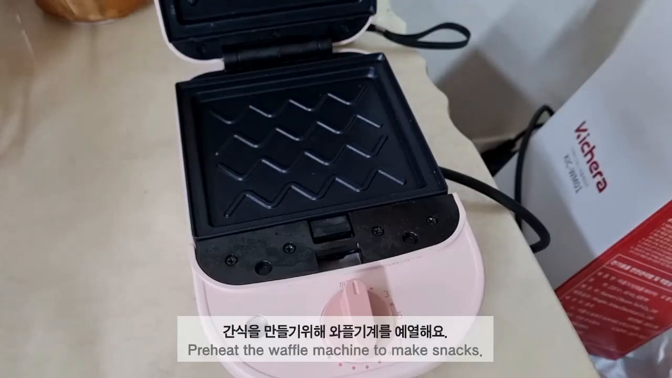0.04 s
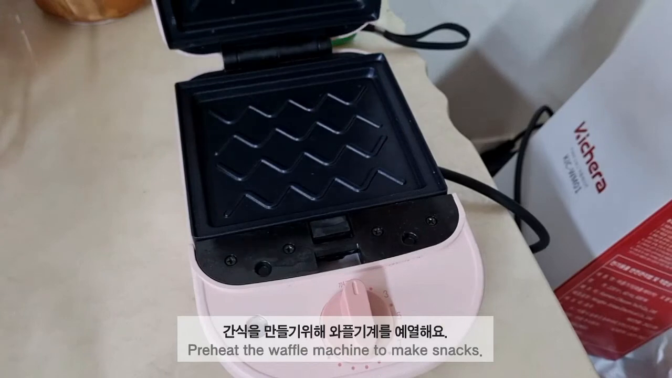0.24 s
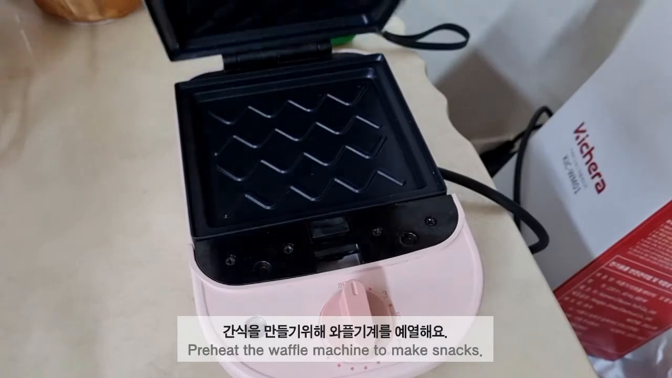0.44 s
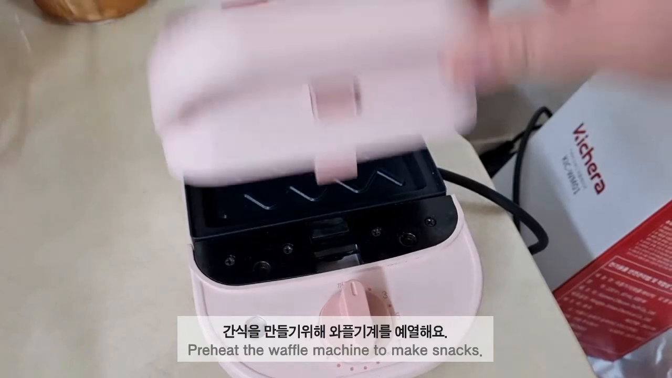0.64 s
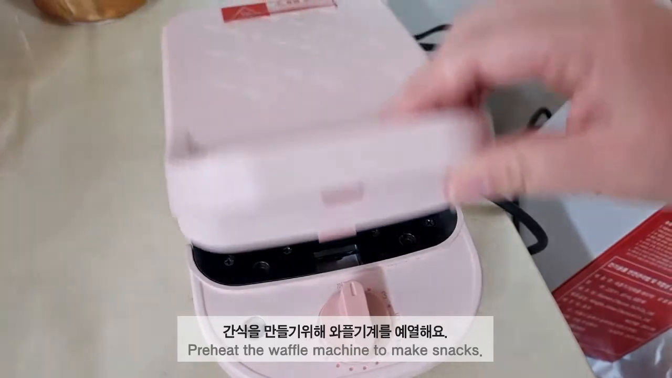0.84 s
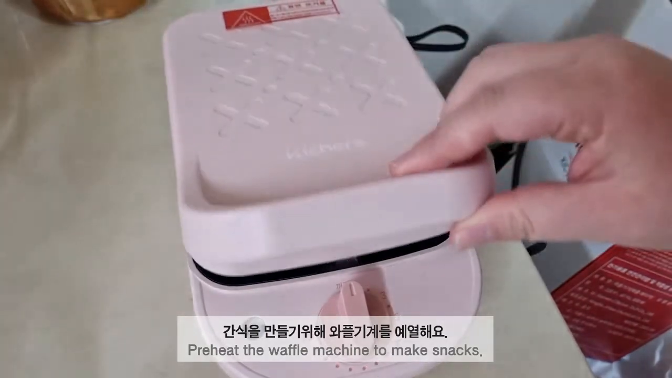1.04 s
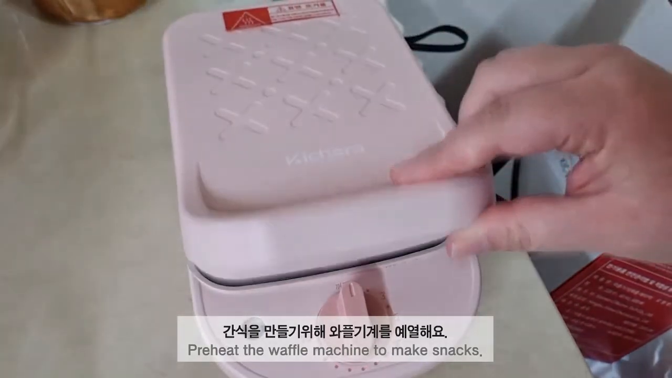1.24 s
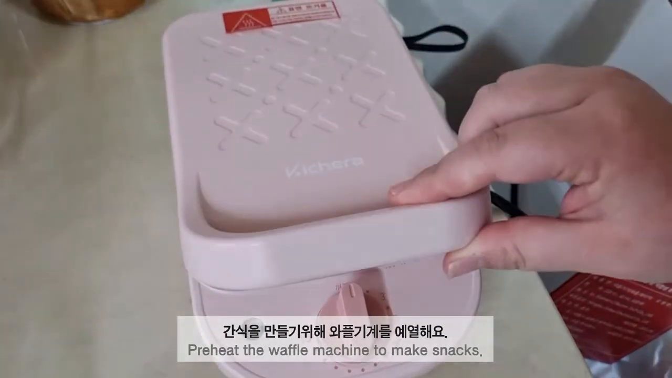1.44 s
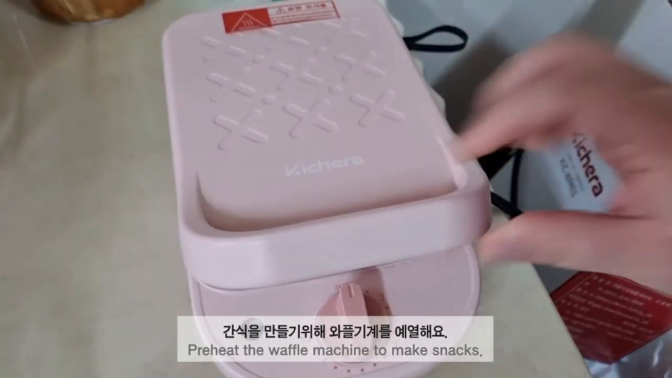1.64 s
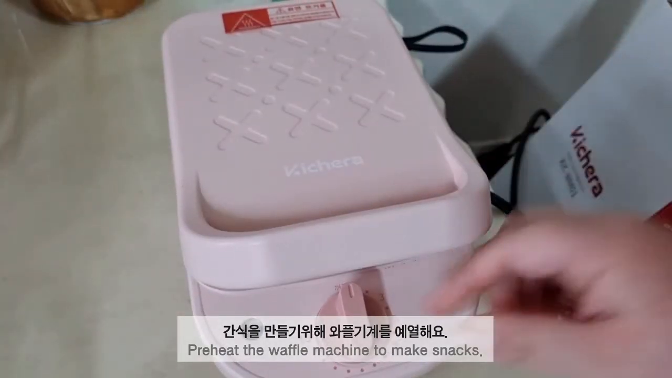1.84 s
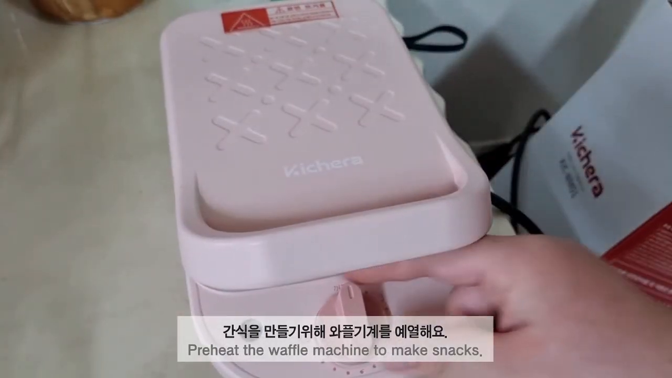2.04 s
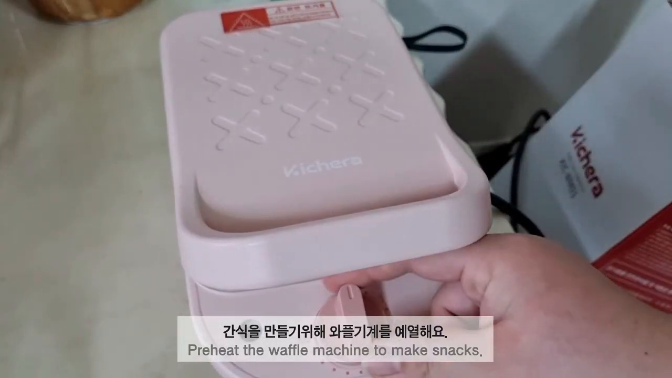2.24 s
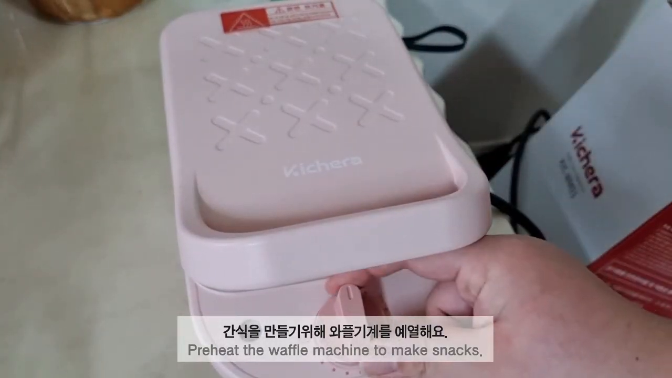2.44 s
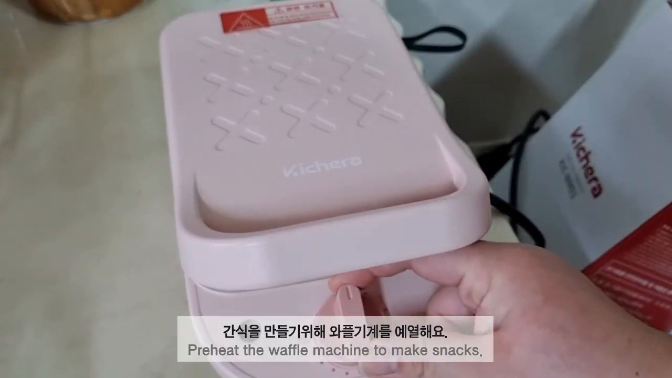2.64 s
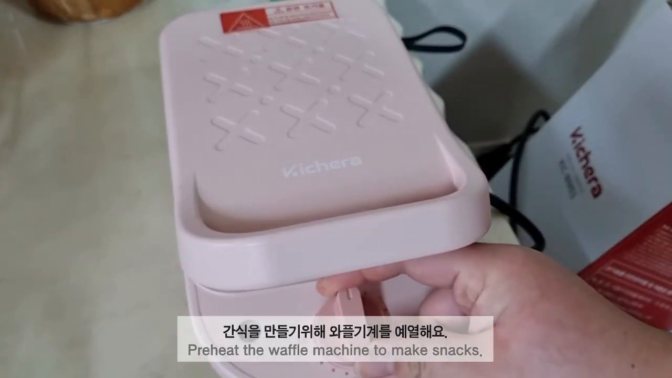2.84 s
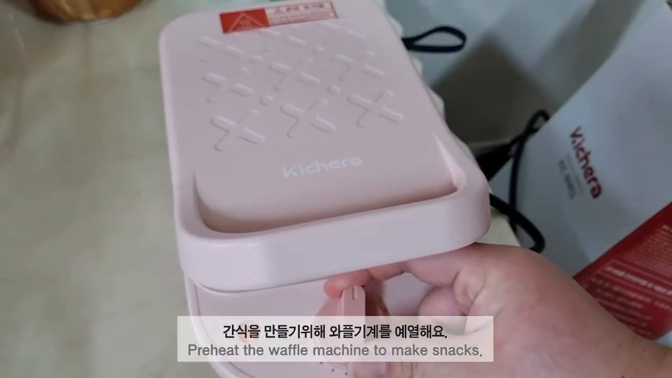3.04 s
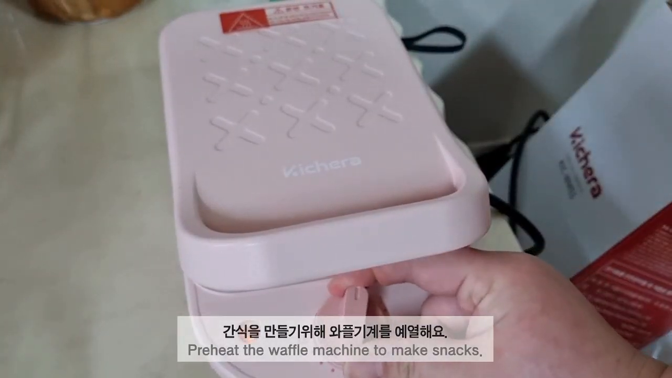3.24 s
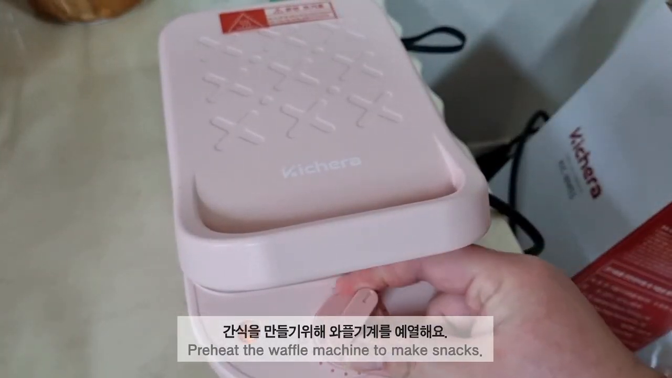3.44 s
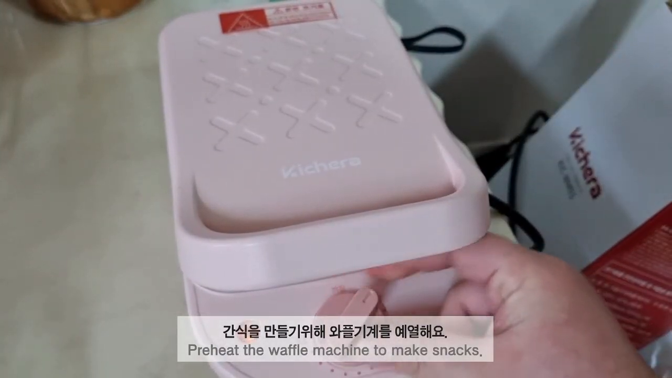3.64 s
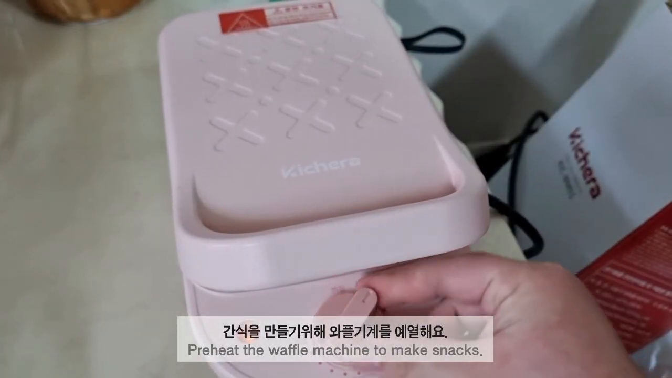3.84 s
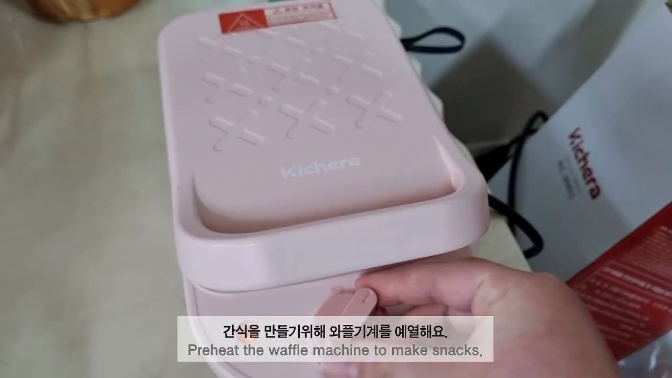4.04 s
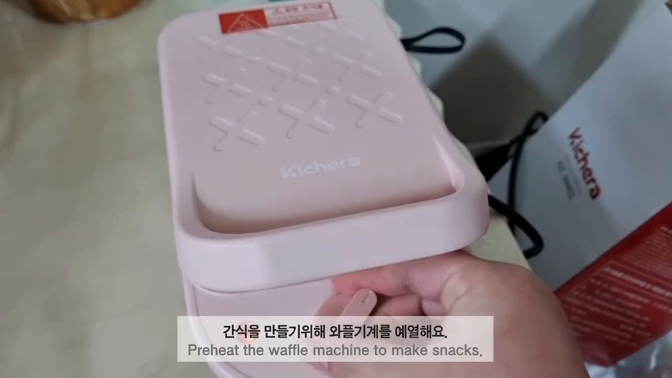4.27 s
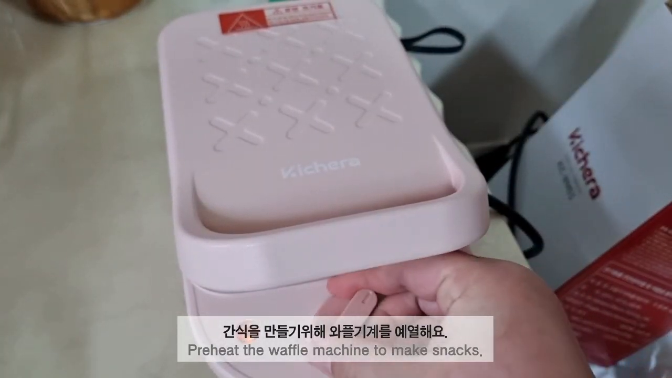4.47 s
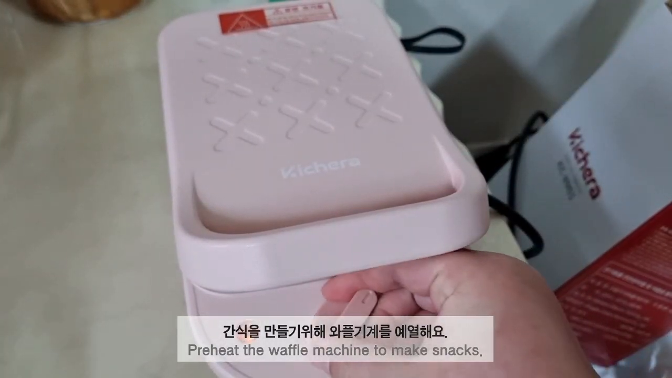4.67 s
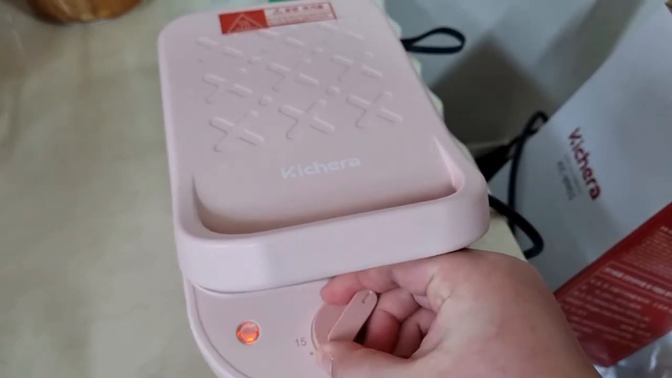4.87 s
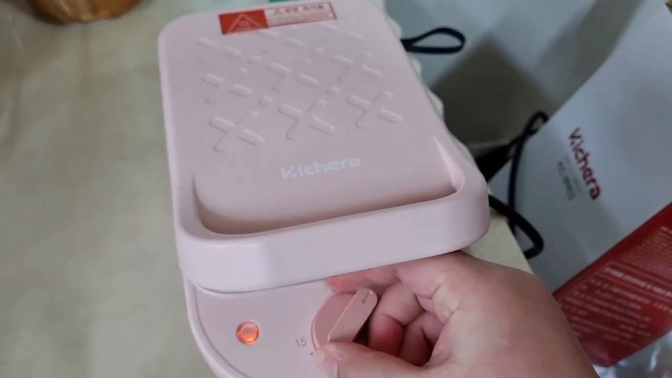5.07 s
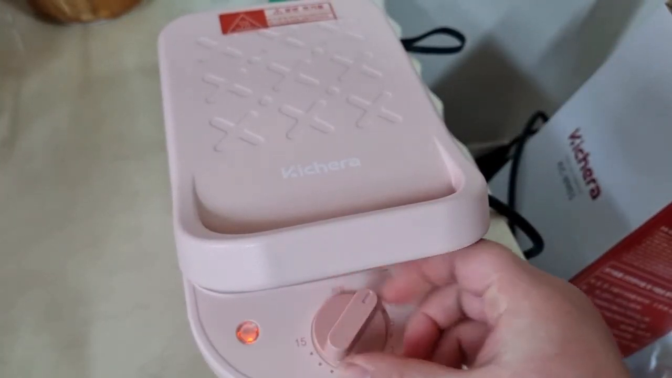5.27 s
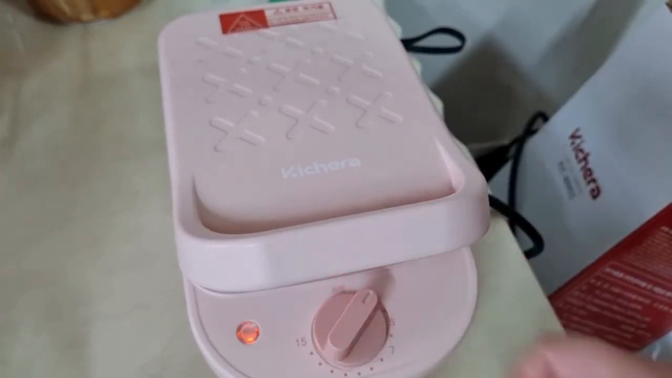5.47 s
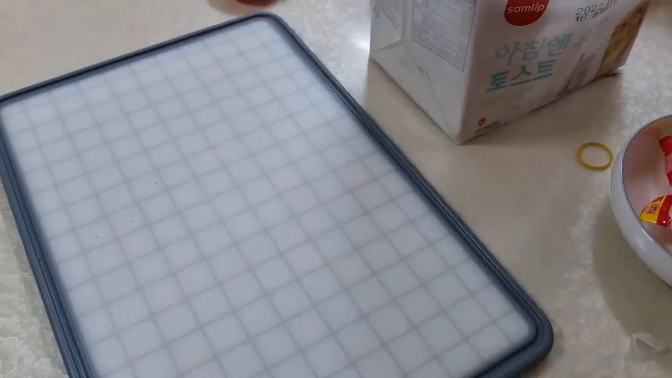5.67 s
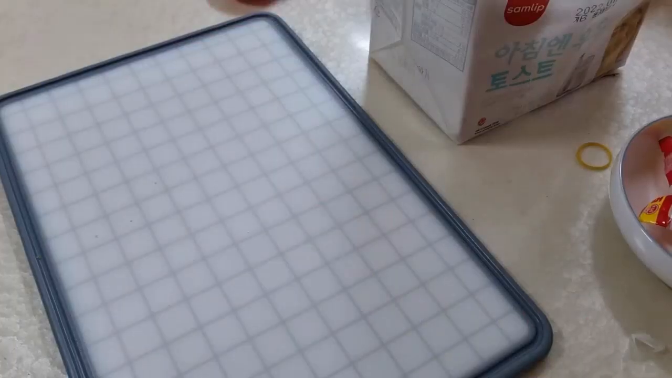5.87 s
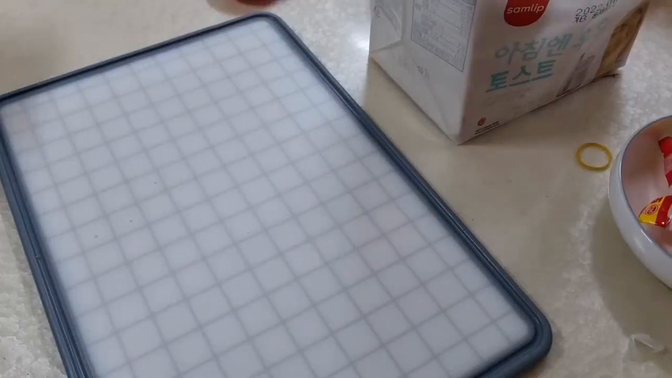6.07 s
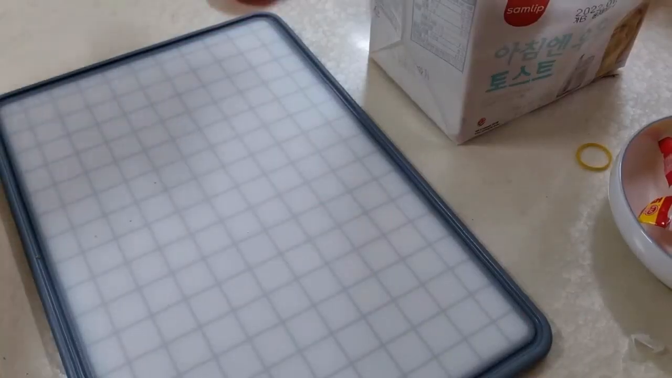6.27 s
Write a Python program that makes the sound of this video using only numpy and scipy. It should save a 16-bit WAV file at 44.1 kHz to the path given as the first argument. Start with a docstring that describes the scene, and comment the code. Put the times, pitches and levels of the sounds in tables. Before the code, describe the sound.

In a small kitchen, a hollow plastic lid snaps closed, followed by a quick ratchety rasp and slow single clicks of a wound dial.

```python
"""Waffle maker lid and timer

A plastic lid is lowered, touches the latch and snaps shut. Then a timer dial is wound: its ratchet clicks
unevenly, slips through one quick run and settles to single clicks, amid soft squeaks and rustles of the hand.
Impacts are sums of decaying modes, a few strong ones over a crowd of weaker ones; rubbing is filtered noise.
A small room answers by convolution with decaying noise, over a rumble of shaped noise and a hum of sine tones."""
import sys
import numpy as np
from scipy import signal
from scipy.fft import rfft, irfft, next_fast_len
from scipy.io import wavfile
from scipy.ndimage import map_coordinates

SR = 44100
rng = np.random.default_rng(int(sys.argv[2]) if len(sys.argv) > 2 else 0)


def dump(signal):
    """Clip the signal to [-1, 1] and save it as 16-bit WAV at the path in sys.argv[1]."""
    limited = np.clip(np.atleast_2d(signal).T, -1, 1)
    pcm = np.round(limited * 32767).astype(np.int16)
    wavfile.write(sys.argv[1], SR, pcm)


N = 278368
TIME = np.arange(N) / SR
TOP_HZ = 16300  # upper limit of the modes and of the recorder's band
PLATE_HZ = 5410  # the metal plate's long ring

# the pawl drops over a tooth of the timer: t/s, level/dB, bass weight of the seating knob/dB, favoured f/Hz
CLICKS = [(3.0328, -38.5, 0, 7600), (3.0521, -36, 12, 6340), (3.0672, -37, 15, 7700),
          (3.08, -36.5, 19, 5730), (3.126, -38, 5, 2620), (3.161, -34, 7, 5600), (3.174, -33.5, 16, 7600),
          (3.4044, -34, 11, 2670), (3.4162, -35.5, 28, 6600), (3.494, -35.5, 23, 1190),
          (3.7635, -28.5, 16, 3800), (4.030, -35.5, 16, 7360), (4.314, -30, 8, 3760),
          (4.5888, -32.5, 2, 3080), (4.864, -23.5, 10, 3950), (5.0903, -35.5, 19, 3850),
          (5.3305, -29.5, 17, 4810), (5.5861, -35.5, 22, 1157)]
# the knob jumps after the pawl and seats: delay, level relative to the drop
SEAT_S, SEAT_DB = 0.0029, -9
# weaker modes of the dial's housing: f/Hz, relative density level/dB
HOUSING_CROWD = [(250, -49), (420, 1.5), (650, -15.5), (900, -1), (1700, -4), (2800, 0.5), (4100, -2.5),
                 (5200, -6), (8000, -4), (9200, -9), (12500, -7.5), (16000, -8.5)]
# decay of the weaker modes of dial and latch tongue: f/Hz, t60/s
SMALL_PART_DECAY = [(500, 0.04), (2500, 0.025), (12000, 0.038)]
# knocks of the lid before the slam, and one faint tick after it:
# t/s, level/dB, contact sharpness f/Hz, favoured f/Hz
KNOCKS = [(1.073, -27.5, 3320, 2570), (1.0904, -25.5, 3199, 1040), (1.0950, -28.5, 2663, 950),
          (1.1308, -23.5, 4445, 632), (1.3069, -30, 8310, 4260), (1.32, -19, 6500, 2700),
          (1.329, -22, 5000, 1210), (1.598, -49, 2420, 1910)]
SLAM_S = 1.3314  # the catch gives way and the lid slams home


def amp(db):
    """Level definition: 20 dB is a tenfold amplitude."""
    return 10 ** (np.asarray(db) / 20)


def unit(x):
    """Normalisation by signal power: x at rms 1."""
    return x / np.sqrt(np.mean(x ** 2) + 1e-20)


def along(points, hz):
    """Interpolation of (Hz, value) points on a logarithmic frequency axis."""
    f, v = np.transpose(points)
    return np.interp(np.log(hz + 1), np.log(f + 1), v)


def wobble(rate):
    """Band-limited random fluctuation: a smooth curve through rate random knots a second."""
    knots = rng.standard_normal(int(N * rate / SR) + 4)
    return map_coordinates(knots, [TIME * rate])


def filtered(x, response):
    """Linear filtering: the spectrum of x times a response of frequency."""
    m = next_fast_len(N + SR // 2)
    spectrum = rfft(x, m) * response(np.fft.rfftfreq(m, 1 / SR))
    return irfft(spectrum, m)[..., :N]


def add(track, s, sound):
    """Superposition: mix a sound into a track at time s."""
    part = track[..., max(round(s * SR), 0):][..., :sound.shape[-1]]
    part += sound[..., :part.shape[-1]]


def ears(x):
    """Interaural coherence: two unrelated signals become a pair alike in the bass, unrelated in the treble."""
    # likeness of a diffuse sound at the two ears: f/Hz, correlation
    coherence = [(60, .94), (200, .96), (300, .65), (550, -.3), (1650, -.2), (5000, 0)]

    def mid_side(hz):
        angle = np.arccos(np.clip(along(coherence, hz), -1, 1)) / 2
        return np.array([np.cos(angle), np.sin(angle)])

    mid, side = filtered(x, mid_side)
    return np.array([mid + side, mid - side])


def leaning(x, left_db):
    """Interaural level difference: shift a sound towards the left ear."""
    return x * amp(left_db * np.array([[.5], [-.5]]))


def hum(lines, waver):
    """Phase modulation: motor tones with slowly wandering phases."""
    out = np.zeros(N)
    for hz, db in lines:
        phase = 2 * np.pi * hz * TIME + waver * wobble(7.4)
        out += np.sqrt(2) * amp(db) * np.sin(phase)
    return out


def background(dip_at_s=5.705, dip_s=0.014, rumble_db=-54.5):
    """Diffuse noise plus tones: the level dips briefly, then the rumble is duller and the hum has other notes."""
    # rumble spectrum: f/Hz, relative density level/dB
    rumble_shape = [(22, -21.5), (37, -20), (48, 3), (78, 0.5), (130, -9), (185, -18.5), (240, -12),
                    (310, -16), (480, -17.5), (750, -21.5), (1500, -36.5), (3100, -47.5), (4500, -63),
                    (8000, -70)]
    # the duller rumble after the dip: f/Hz, gain/dB
    rumble_change = [(200, -1), (700, -2.5), (1500, -1), (2700, -7), (4000, 0.5)]
    # hum of kitchen appliances before and after the dip: f/Hz, level/dB
    hum_first = [(237, -72.5), (301, -71.5), (479, -80), (721, -81.5), (824, -84.5)]
    hum_later = [(119, -74), (216, -76.5), (300, -76.5), (500.6, -74.5), (602, -78.5), (823.6, -75.5)]
    noise = filtered(rng.standard_normal((2, N)), lambda hz: amp(along(rumble_shape, hz)))
    rumble = amp(rumble_db) * unit(ears(noise))
    first = rumble + hum(hum_first, waver=0.91)
    duller = filtered(rumble, lambda hz: amp(along(rumble_change, hz)))
    later = duller + hum(hum_later, waver=0.55)
    dip = 1 - np.exp(-((TIME - dip_at_s) / dip_s) ** 4)
    return np.where(TIME < dip_at_s, first, later) * dip


def kitchen(x, t60, build_s):
    """Reverberation: the tail builds up from the first walls, and each frequency dies at its own speed."""
    # the room's response: f/Hz, gain/dB
    room_gain = [(120, -16), (310, -13.5), (470, -18), (700, -10.5), (1200, -12.5), (1700, -10),
                 (2700, -10), (5000, -12), (12000, -11.5)]
    hz, t, z = signal.stft(rng.standard_normal((2, SR * 2 // 3)), SR, nperseg=256)
    fade = amp(-60 * t / along(t60, hz)[:, None]) * (1 - np.exp(-(t / build_s) ** 2))
    fade /= np.sqrt(np.mean(fade ** 2, axis=1, keepdims=True))
    gain = amp(along(room_gain, hz))[:, None]
    tail = signal.istft(z * fade * gain, SR, nperseg=256)[1]
    return signal.fftconvolve(x, tail / np.sqrt(tail.shape[1]), axes=1)


def room(x, build_s, count=24):
    """Time-varying reverberation: each of count equal stretches of sound gets its own random tail."""
    # reverberation time: f/Hz, t60/s
    room_t60 = [(120, 0.5), (600, 0.48), (2000, 0.2965), (5000, 0.26), (8000, 0.245), (13000, 0.17)]
    out = np.zeros((2, N))
    for part, times in zip(np.array_split(x, count, axis=1), np.array_split(TIME, count)):
        add(out, times[0], kitchen(part, room_t60, build_s))
    return ears(out)


def fingers(q=22):
    """Resonant filtering: brief noise through one narrow peak gives the audible squeaks of skin on plastic."""
    # narrow noises, audible squeaks but for a practically unheard trace at 7670 Hz:
    # centre t/s, level/dB, f/Hz, half-length/s
    rubs = [(.675, -74.5, 4420, 0.026), (.968, -80, 7670, .014), (1.636, -73, 4280, 0.012),
            (2.147, -69.5, 5100, 0.03), (2.147, -71, 1690, 0.026), (2.575, -68, 1190, 0.019),
            (3.535, -68, 5000, 0.034), (3.667, -80, 5000, 0.037), (4.115, -64, 1200, .05),
            (4.483, -59, 1150, .008), (4.517, -67, 1130, .025), (5.143, -63.5, 5030, 0.018)]
    out = np.zeros((2, N))
    for s, db, hz, half_length in rubs:
        swell = np.hanning(round(2 * half_length * SR))
        b, a = signal.iirpeak(hz, q / 2, SR)
        once = signal.lfilter(b, a, rng.standard_normal((2, len(swell))))
        rub = signal.lfilter(b, a, once)
        add(out, s - half_length, amp(db) * swell * unit(rub))
    return out


def friction(soft_hz, grain_db, grain_rate):
    """Modulated noise: grainy rubbing heard through the dial's housing, at rms 1."""
    def housing(hz):
        return amp(along(HOUSING_CROWD, hz)) / np.hypot(1, (hz / soft_hz) ** 2)

    noise = filtered(rng.standard_normal((2, N)), housing)
    return unit(noise * amp(grain_db * wobble(grain_rate)))


def rustle(fade_s=0.013):
    """Sliding friction: skin rubs unevenly over the knob whenever the grip changes."""
    # the hand takes hold, shifts its grip and lets go: start t/s, end t/s, level/dB
    grips = [(2.963, 3.04, -75), (3.047, 3.193, -65), (4.1, 4.24, -82.5), (5.135, 5.224, -76),
             (5.376, 5.691, -77)]
    slide = np.zeros(N)
    for start, end, db in grips:
        slide += amp(db) * np.interp(TIME, [start - fade_s, start, end, end + fade_s], [0, 1, 1, 0])
    return slide * friction(soft_hz=3250, grain_db=2, grain_rate=120)


def climbing():
    """Friction swells before each click: longer after a long gap, louder before a loud click."""
    share, longest_s, release_s = 0.14, 0.039, 0.0079  # share of the time since the last click
    relative_db = -26.5  # relative to the click
    s, db, *_ = np.transpose(CLICKS)
    lengths = np.minimum(share * np.diff(s, prepend=0), longest_s)
    swells = np.zeros(N)
    for at, level, length in zip(s + SEAT_S, db, lengths):
        swells += amp(level + relative_db) * np.interp(TIME, [at - length, at, at + release_s], [0, 1, 0])
    return swells * friction(soft_hz=6150, grain_db=3.5, grain_rate=180)


def contacts(s, db, sharp_hz, weight_db, spot_hz):
    """Impact rows from columns or constants: t/s, level/dB, sharpness f/Hz, bass weight/dB, favoured f/Hz."""
    return np.column_stack(np.broadcast_arrays(s, db, sharp_hz, weight_db, spot_hz))


def ring(hits, hz, size, t60, attack, length, spot_db=0, bass_hz=500, scatter_db=3):
    """Modal synthesis: each hit starts all modes anew; a soft contact misses the treble, a light one the bass."""
    # the plastic's sound at the two ears: f/Hz, likeness; and f/Hz, left-right difference/dB
    likeness = [(240, .98), (400, .4), (530, -.35), (700, -.35), (1400, .06), (3100, 0), (15000, 0)]
    ear_difference = [(110, 3), (200, -5), (340, -8), (470, -0.5), (700, 1), (1250, 4.5), (2200, 0.5),
                      (8000, -0.5), (15000, -1.5)]
    spot_octaves = 0.2  # width of the band that the struck spot throws towards the listener
    t = np.arange(length) / SR
    decaying = np.exp(np.outer(2j * np.pi * hz - np.log(1000) / t60, t))
    waves = decaying * (1 - np.exp(-t / attack)) ** 2
    s, db, sharp_hz, weight_db, spot_hz = np.transpose(hits)[..., None]
    softness = np.hypot(1, (hz / sharp_hz) ** 3)
    favour_db = spot_db * np.exp(-(np.log2(hz / spot_hz) / spot_octaves) ** 2)
    bass_db = weight_db / (1 + (hz / bass_hz) ** 2)
    contact = amp(db + favour_db + bass_db) / softness
    # new phases and strengths at each hit
    phase, strength = rng.uniform(-1, 1, (2, len(s), len(hz)))
    start = -1j * size * contact * amp(scatter_db * strength) * np.exp(1j * np.pi * phase)
    # every mode radiates its own pattern, so the ears get it at different phases and levels
    angle = np.arccos(np.clip(along(likeness, hz), -1, 1))
    apart = np.exp(.5j * angle * (-1) ** np.arange(len(hz)))
    pattern = amp(along(ear_difference, hz) / 2) * apart
    left = ((start * pattern) @ waves).real
    right = ((start / pattern) @ waves).real
    out = np.zeros((2, N))
    for at, l, r in zip(s[:, 0], left, right):
        add(out, at, np.array([l, r]))
    return out


def strike(hits, modes, modes_db, crowd, crowd_db, decay, attack, spot_db, count=420):
    """Modal density: a plastic part has a few strong modes over a crowd of weaker ones."""
    hz, db, t60 = np.transpose(modes)
    strong = ring(hits, hz, amp(db + modes_db), t60, attack, SR // 2, spot_db)
    hz = TOP_HZ * ((np.arange(count) + 1 + rng.random(count)) / (count + 1)) ** 2
    size = amp(along(crowd, hz)) * np.sqrt(np.gradient(hz))  # wider spacing, stronger modes
    size *= amp(crowd_db) / np.linalg.norm(size)
    weak = ring(hits, hz, size, along(decay, hz), attack, SR // 10, spot_db)
    return strong + weak


def twist():
    """Repeated impacts: one run so quick that its uneven teeth blur into a coarse rasp."""
    # the pawl runs over many teeth: t/s, level/dB, teeth per s, contact sharpness f/Hz, favoured f/Hz
    quick_run = [(3.2665, -34.5, 181, 16100, 2900), (3.283, -33.5, 297, 13000, 3030),
                 (3.307, -31.5, 383, 11600, 2650), (3.327, -32.5, 440, 9100, 2730),
                 (3.347, -38.5, 350, 8400, 2700)]
    s, db, rate, sharp_hz, spot_hz = np.transpose(quick_run)
    passed = np.cumsum(np.interp(TIME, s, rate, left=0, right=0)) / SR
    at = TIME[1:][np.diff(np.ceil(passed)) > 0]  # one contact for each tooth passed
    late_s, uneven_db = (rng.uniform(-1, 1, (len(at), 2)) * [.0009, 3.5]).T
    level_db = np.interp(at, s, db) + uneven_db
    return contacts(at + late_s, level_db, np.interp(at, s, sharp_hz), 0, np.interp(at, s, spot_hz))


def dial(spot_db, modes_db):
    """A shared resonator: pawl drops, seating knob, small ticks and the quick run ring the same housing."""
    # strong modes of the housing: f/Hz, level/dB, t60/s
    housing_modes = [(1205, -15.5, 0.086), (2023, -15, 0.063), (2617, -13.5, 0.05), (2786, -12.5, 0.03),
                     (3032, -10, 0.015), (4010, -14, 0.047), (4355, -21.5, 0.065), (5044, -21, 0.059),
                     (6040, -20, 0.031), (6900, -17.5, 0.03), (7340, -11, 0.013), (8030, -10.5, 0.014)]
    # the knob shifts in its play under the fingers: t/s, level/dB, favoured f/Hz
    play_ticks = [(2.573, -74, 1201), (2.664, -65.5, 4500), (2.958, -53.5, 7200), (2.976, -51.5, 2587),
                  (3.549, -62, 5000), (3.7352, -52, 3000), (3.742, -46.5, 4086), (4.153, -61, 4200),
                  (4.771, -69, 2636), (4.789, -63, 2650), (4.8565, -41, 2300), (4.957, -60, 2700),
                  (5.139, -54.5, 5050), (5.18, -51.5, 2640), (5.219, -56, 2040), (5.3163, -47, 2700)]

    def housing(hits, favour_db):
        return strike(hits, housing_modes, modes_db, crowd=HOUSING_CROWD, crowd_db=-1.5,
                      decay=SMALL_PART_DECAY, attack=0.00044, spot_db=favour_db)

    s, db, weight_db, spot_hz = np.transpose(CLICKS)
    drops = contacts(s, db, sharp_hz=16600, weight_db=-30, spot_hz=spot_hz)
    # the knob seats with a duller, fuller contact
    seats = contacts(s + SEAT_S, db + SEAT_DB, sharp_hz=6550, weight_db=weight_db, spot_hz=spot_hz)
    s, db, spot_hz = np.transpose(play_ticks)
    ticks = contacts(s, db, sharp_hz=4230, weight_db=11, spot_hz=spot_hz)
    single = housing(np.vstack([drops, seats, ticks]), spot_db)
    # the quick run pumps its favoured band 2 dB harder than a single click does
    return single + housing(twist(), spot_db + 2)


def latch_tongue(spot_db):
    """Impact of a small part: the latch tongue meets its catch and stutters."""
    # taps: t/s, level/dB, contact sharpness f/Hz, bass weight/dB, favoured f/Hz
    taps = [(0.9142, -30, 12130, 2, 2290), (0.9178, -36, 3000, 4, 1300)]
    # strong modes: f/Hz, level/dB, t60/s; weaker modes: f/Hz, relative density level/dB
    tongue_modes = [(1070, -2, 0.098), (1190, -3, .04), (1910, -7.5, 0.029), (2066, -8, 0.035),
                    (4020, -18, 0.034), (5000, -25.5, 0.04), (6900, -29.5, 0.03)]
    tongue_crowd = [(290, -47.5), (500, -15), (697, -21.5), (985, -4), (1530, -16.5), (2050, -9),
                    (3130, -24.5), (4140, -28), (12000, -88), (15600, -108), (22000, -120)]
    return strike(taps, tongue_modes, modes_db=-6, crowd=tongue_crowd, crowd_db=-4,
                  decay=SMALL_PART_DECAY, attack=0.00022, spot_db=spot_db)


def shell(spot_db, modes_db):
    """Impact and rebound: the lid knocks, slams home, chatters against the base and rattles as it rebounds."""
    # strong modes, the metal plate's among them: f/Hz, level/dB, t60/s
    lid_modes = [(581, -5, 0.07), (713, -6, 0.07), (825.3, -8, 0.064), (904.6, -10, 0.11), (920, -34.5, .8),
                 (1190, 1.5, 0.05), (1380, -13.5, 0.07), (1517, -17, 0.093), (1700, -4, 0.045),
                 (1822, -8, 0.05), (1950, -7.5, 0.04), (2060.6, -8.5, 0.066), (3180, -9, 0.059),
                 (4708, -12.5, 0.05), (4920, -12.5, 0.044), (5218, -9, 0.049), (PLATE_HZ, -42, 0.7),
                 (6770, -21, .04), (11230, -24, 0.065)]
    # weaker modes: f/Hz, relative density level/dB; and their decay: f/Hz, t60/s
    lid_crowd = [(60, -45), (150, -22.5), (220, -11), (300, -12), (460, 0), (800, -1.5), (1300, -11.5),
                 (1800, -3), (2500, -12.5), (3600, -13.5), (5200, -12), (7000, -18.5), (10000, -27.5),
                 (12500, -25.5), (16000, -37.5)]
    lid_decay = [(150, 0.075), (1000, 0.021), (5000, 0.048), (14000, 0.076)]
    chatter_s, chatter_loss_db = .0029, -0.5  # from one contact to the next; a negative loss is a gain
    rebound_s, rebound_db, rebound_loss_db = 0.017, -22.5, 6.5  # interval, first level, loss at each
    slam_db, slam_weight_db = -5, -2
    k, bounce = np.arange(4), np.arange(3)
    slams = contacts(SLAM_S + chatter_s * k, slam_db - chatter_loss_db * k,
                     sharp_hz=14954, weight_db=slam_weight_db, spot_hz=4870)
    rebounds = contacts(SLAM_S + rebound_s * (bounce + 1), rebound_db - rebound_loss_db * bounce,
                        sharp_hz=6520, weight_db=slam_weight_db, spot_hz=677)
    s, db, sharp_hz, spot_hz = np.transpose(KNOCKS)
    knocks = contacts(s, db, sharp_hz, weight_db=-5, spot_hz=spot_hz)
    hits = np.vstack([slams, rebounds, knocks])
    return strike(hits, lid_modes, modes_db, crowd=lid_crowd, crowd_db=-4.5,
                  decay=lid_decay, attack=.0004, spot_db=spot_db)


def thump(knock_db=-24, slam_db=-25.5, feet_hz=800):
    """Low-frequency resonance: knocks and slam push the whole appliance on its feet and its hollow base."""
    # low modes: f/Hz, level/dB, t60/s
    feet_modes = [(88, -12, 0.18), (120.8, -1.5, .15), (148, -2.5, 0.13), (317, -3, .14), (436, 8, 0.075),
                  (457, 14, 0.059), (490, 10.5, 0.061)]
    s, db, *_ = np.transpose(KNOCKS)
    # a knock's push is relative to the knock
    pushes = contacts(np.append(SLAM_S, s), np.append(slam_db, db + knock_db), feet_hz, 0, feet_hz)
    hz, mode_db, t60 = np.transpose(feet_modes)
    return ring(pushes, hz, amp(mode_db), t60, attack=0.0018, length=SR // 2)


def lid(spot_db, modes_db):
    """Superposition of parts: latch tongue, plastic shell and the appliance on the counter."""
    return latch_tongue(spot_db) + shell(spot_db, modes_db) + thump()


def scene(lid_down_s=1.28, ajar_db=-4, ajar_left_db=4, dial_left_db=1.5):
    """Direct and reverberant fields: lid sounds are drier and further left while the lid is ajar."""
    ajar = TIME < lid_down_s
    rubbing = climbing() + fingers() + rustle()
    lid_direct = leaning(lid(spot_db=5, modes_db=-12.5), ajar * ajar_left_db)
    dial_direct = leaning(dial(spot_db=4.5, modes_db=-3) + rubbing, dial_left_db)
    # the room gathers the sound of all sides: no favoured band, and weaker strong modes
    lid_echo = amp(2.0) * room(amp(ajar * ajar_db) * lid(spot_db=0, modes_db=-18), build_s=.008)
    dial_echo = amp(0.55) * room(dial(spot_db=0, modes_db=-5.5) + rubbing, build_s=0.0042)
    return lid_direct + dial_direct + lid_echo + dial_echo + background()


def record(dry):
    """Saturation and band limiting: peaks near full scale are rounded, then a steep low-pass cuts the top."""
    rounded = dry / (1 + (dry / .95) ** 8) ** (1 / 8)
    return filtered(rounded, lambda hz: 1 / (1 + (hz / TOP_HZ) ** 160))


dry = scene()
out = record(dry)
dump(out)
```